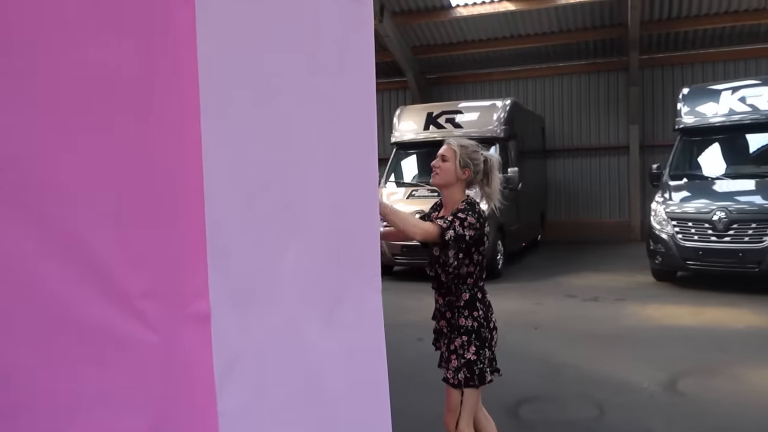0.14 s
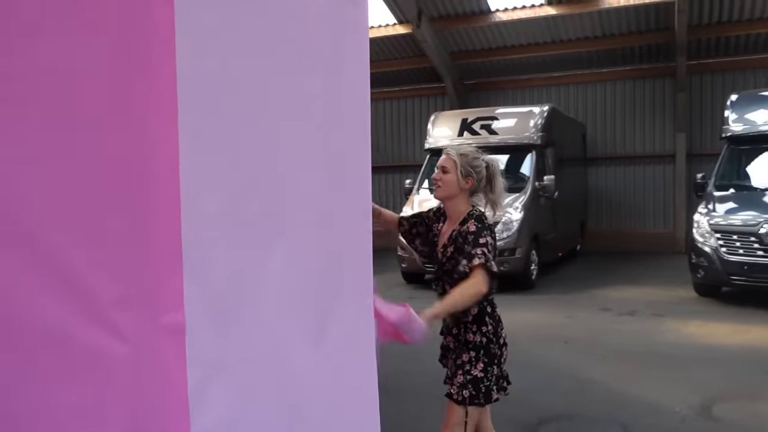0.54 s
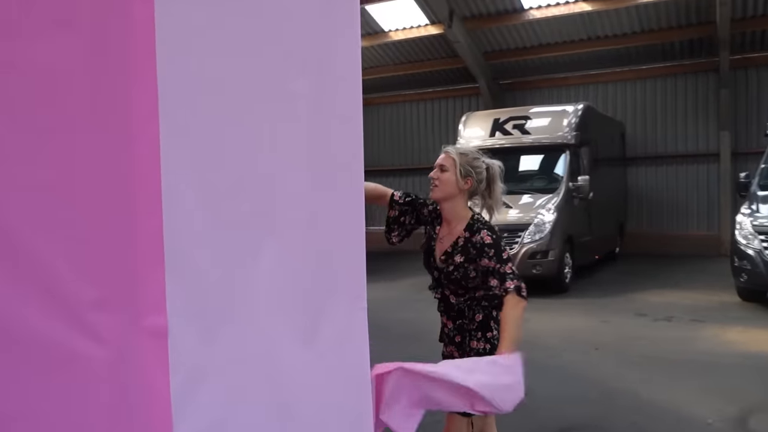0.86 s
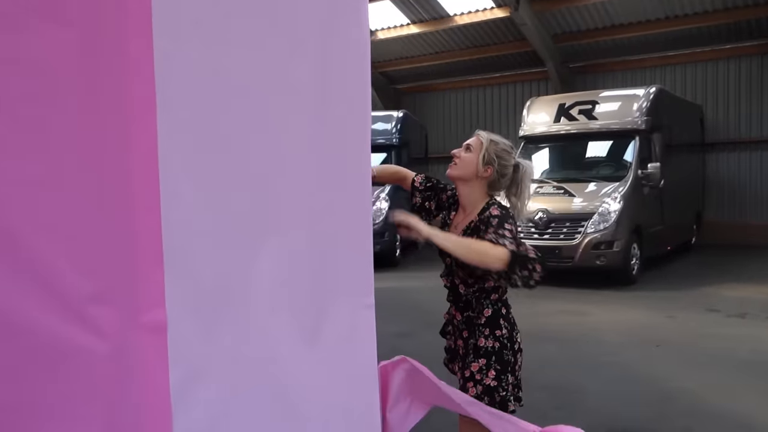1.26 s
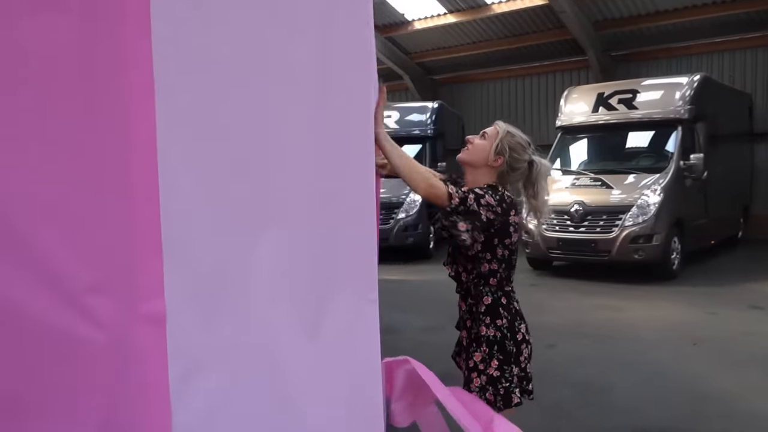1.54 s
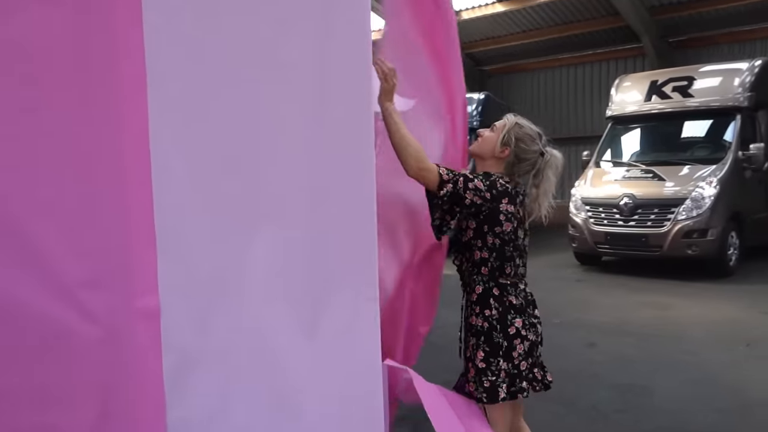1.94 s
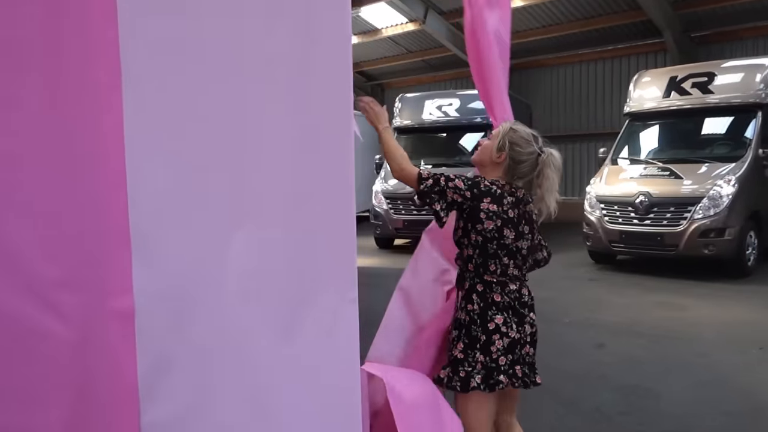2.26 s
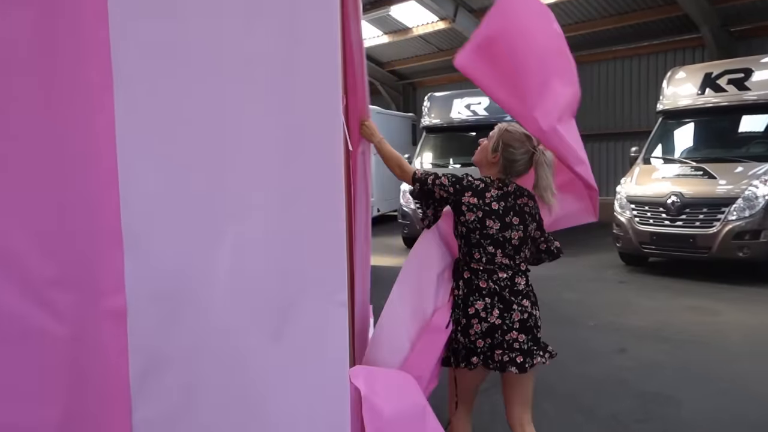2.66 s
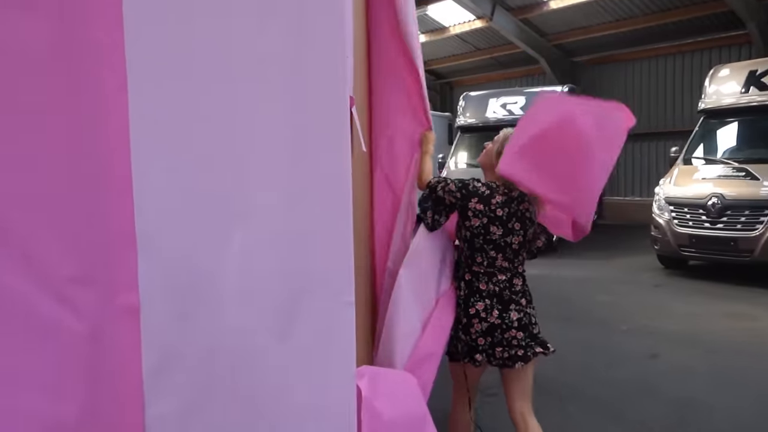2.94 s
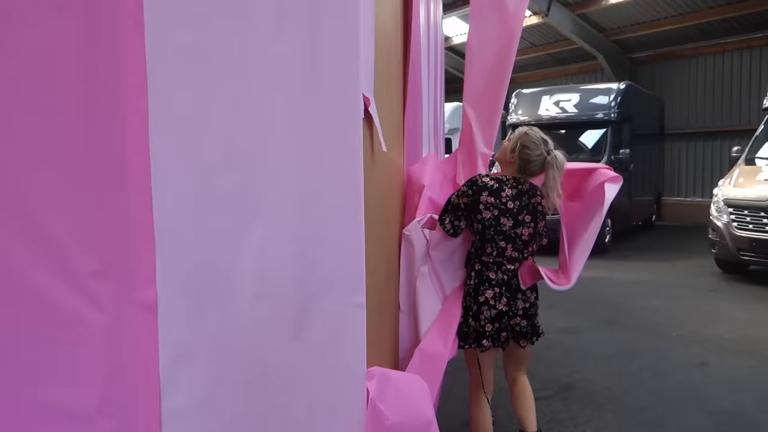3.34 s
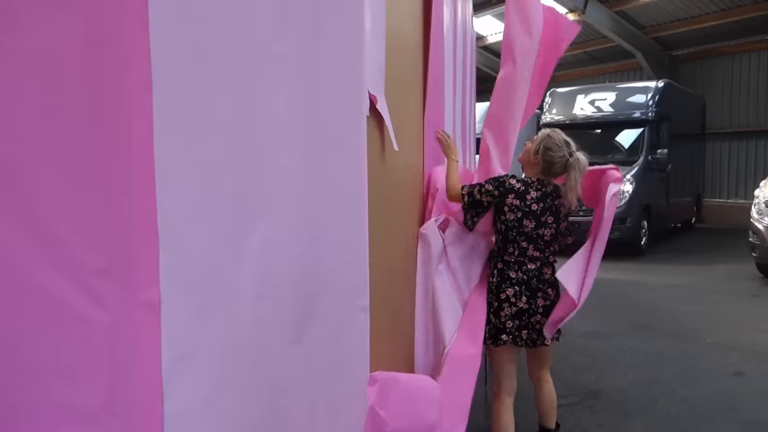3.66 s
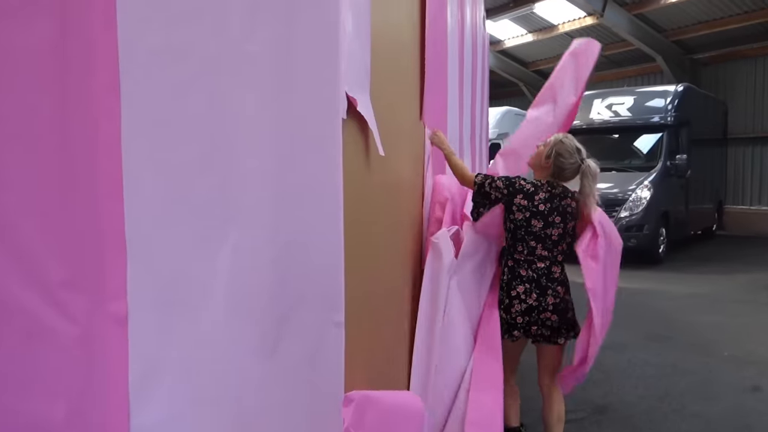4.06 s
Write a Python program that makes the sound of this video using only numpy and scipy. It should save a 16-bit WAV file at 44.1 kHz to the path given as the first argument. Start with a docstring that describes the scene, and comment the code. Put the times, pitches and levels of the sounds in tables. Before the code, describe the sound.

Large sheets of wrapping paper are torn away by hand in a big, reverberant shed. At the start a tear is already under way, running out by about 0.5 s with a brief snap near 0.3 s. Small creases pop between 0.6 and 0.9 s as a second pull builds, loudest around 0.9-1.2 s, then fades into echo. Another swells from 1.5 s, bursts at about 1.8-2.1 s and trails off with a short jerk. Quick rips and stalls from 2.6 s lead to close pulls near 2.7-3.2 s, bright and crackling. After a rattling lull around 3.4 s, the final hard tear runs from 3.6 s to the end, with strong snaps. Throughout, buckling folds rattle in the mid range and loose paper flaps faintly. The shed's middle tones linger for seconds while treble dies quickly; a very faint low hum lies beneath. Close stereo, treble leaning right.

```python
"""In a large shed, big sheets of wrapping paper are ripped down by hand, a little to the right.
Fibres part in a bright, clumped crackle, and the loose sheet rattles and flaps lower down: all are
shaped noise that follows the pulls of an arm. Single creases snap as short bursts of the same breaks.
The shed keeps the middle tones ringing between pulls as decaying noise, over a faint, wavering hum."""
import sys
import numpy as np
from scipy import signal
from scipy.fft import rfft, irfft, next_fast_len
from scipy.io import wavfile
from scipy.ndimage import uniform_filter1d, minimum_filter1d, map_coordinates

SR = 44100
rng = np.random.default_rng(int(sys.argv[2]) if len(sys.argv) > 2 else 0)


def gain_from_decibels(decibels):
    """Convert decibel values to linear amplitude factors."""
    exponent = np.asarray(decibels, float) / 20
    return 10 ** exponent


def unload_audio(sound):
    """Save the sound as a 16-bit wav file, at the path given as the first command line argument."""
    columns = np.transpose(np.atleast_2d(sound))
    # keep every value between -1 and 1, then stretch to whole-number steps
    steps = np.round(np.clip(columns, -1, 1) * 32767)
    wavfile.write(sys.argv[1], SR, steps.astype(np.int16))


N = 185264
LEAD = 2 * SR  # samples of tearing before time zero, whose echo is still in the shed
M = N + LEAD


def unit(x):
    """Normalisation: a signal scaled to rms 1."""
    return x / np.sqrt(np.mean(x ** 2) + 1e-20)


def along(points, hz):
    """Logarithmic frequency scale: (Hz, value) points interpolated along it."""
    f, v = np.transpose(points)
    return np.interp(np.log(hz + 1), np.log(f + 1), v)


def wobble(rate):
    """Band-limited fluctuation: a smooth random curve with rate knots a second."""
    knots = rng.standard_normal(int(M * rate / SR) + 4)
    return map_coordinates(knots, [np.arange(M) * rate / SR])


def filtered(x, response):
    """Linear filtering: the spectrum of x times a response of frequency."""
    m = next_fast_len(x.shape[-1] + 8192)
    spectrum = rfft(x, m) * response(np.fft.rfftfreq(m, 1 / SR))
    return irfft(spectrum, m)[..., :x.shape[-1]]


def coloured(x, spectrum):
    """Spectral shaping: x weighted by a (Hz, dB) curve and scaled to rms 1."""
    return unit(filtered(x, lambda hz: gain_from_decibels(along(spectrum, hz))))


def tilted(x, split_hz, tilt_db):
    """Spectral tilt: the part under the split raised and the part over it lowered by a changing amount."""
    low = filtered(x, lambda hz: 1 / (1 + (hz / split_hz) ** 4))
    return gain_from_decibels(tilt_db) * low + gain_from_decibels(-tilt_db) * (x - low)


def grains(spike_db, clump_db):
    """Crackling noise: countless tiny breaks, most weak and a few strong, clumped, along two unlike paths."""
    spikes_db = spike_db * rng.exponential(size=M)
    clumps_db = clump_db * wobble(60) + clump_db * 0.24 * wobble(250)
    return rng.standard_normal((2, M)) * gain_from_decibels(spikes_db + clumps_db)


def patchy(x, depth_db):
    """Brief resonance: each fold rings at its own pitch, as random gain in patches of time and frequency."""
    z = signal.stft(x, nperseg=256)[2]
    field = uniform_filter1d(rng.standard_normal(z.shape[1:]), size=4, axis=0)
    field = uniform_filter1d(field, size=8, axis=1)
    return signal.istft(z * gain_from_decibels(depth_db * unit(field)), nperseg=256)[1][:, :M]


# Spectrum of the air noise. Each row: frequency in Hz, relative density in dB per Hz.
AIR_SPECTRUM = [(12, -59), (20, -28), (140, -9), (250, -4.5), (320, -35), (550, -120)]
# Steady tone. Each row: frequency in Hz, mean amplitude in dB before the stereo stage.
HUM_TONES = [(107, -67.5)]


def background():
    """Stationary noise and a modulated tone: low, lumpy air under a slightly unsteady hum."""
    t = np.arange(M) / SR
    hum = 0
    for hz, db in HUM_TONES:
        level = gain_from_decibels(db + 2 * wobble(5))
        hum = hum + level * np.sin(2 * np.pi * hz * t + 1.2 * wobble(6))
    air = coloured(rng.standard_normal((2, M)), AIR_SPECTRUM)
    return hum + gain_from_decibels(-58.5 + 3.0 * wobble(7)) * air


# Reverberation of the shed. Each row: frequency in Hz, time to decay by 60 dB in seconds (at least .05).
SHED_DECAY = [(200, 3.1), (1500, 2.53), (4000, 0.92), (8000, 0.21), (15000, 0.048)]


def shed(x):
    """Diffuse reverberation: the power of each frequency dies at its own speed, carried by fresh noise."""
    hz, t, z = signal.stft(x[0], SR, nperseg=256)
    decay_s = np.clip(along(SHED_DECAY, hz), .05, 4)[:, None]
    linger = gain_from_decibels(-120 * t / decay_s)  # a power: 60 dB down after decay_s
    linger = linger * (t > .018) / linger.sum(axis=1, keepdims=True)  # the walls are some metres away
    power = np.abs(signal.fftconvolve(np.abs(z) ** 2, linger, axes=1)[:, :len(t)])
    noise = signal.stft(rng.standard_normal((2, M)), SR, nperseg=256)[2]
    carrier = unit(np.abs(noise)) * np.exp(1j * np.angle(noise))
    echo = signal.istft(carrier * np.sqrt(power), SR, nperseg=256)[1][:, :M]
    return x + gain_from_decibels(-2.0) * echo


# Spectrum of the buckling sheet and of dull snaps. Each row: frequency in Hz, relative density in dB per Hz.
RATTLE_SPECTRUM = [(180, -47), (300, -21.5), (499, -20), (548, -15), (680, -7), (734, -6.5), (781, -8),
                   (2230, -0.5), (12000, -20), (15600, -53), (22000, -120)]
# Spectrum of sharp breaks. Each row: frequency in Hz, relative density in dB per Hz.
TICK_SPECTRUM = [(1500, -38), (3500, -6.5), (6000, 0), (10000, -6), (15700, -6.5)]
# Creases snapping. Each row: start in seconds, relative strength in dB, dull part over the bright
# part in relative dB, thickness as a bass tilt in dB (held at -2.5 or more).
CREASE_SNAPS = [(0.319, -6, -15, 6), (0.5404, -29, 1, 0.3), (0.6434, -13.5, -5, 7.5), (0.6844, -16, -8, 5),
                (0.697, -14, -6, 0.3), (0.7254, -9, -4, 7), (0.7674, -20, -6, 0.3), (0.786, -18, 13, 0.3),
                (0.799, -12.5, 13, 0.3), (0.8134, -23, -7, 0.3), (0.8574, -13, 12, 0.3),
                (0.95, -9, -3, 0.3), (1.542, -11.5, -11, 0.3), (1.6104, -16, 2, 0.3),
                (1.6951, -16, 11, 0.3), (1.711, -14, 6, 0.3), (1.736, -17, 9, -1), (1.7579, -16, -1, 0.3),
                (1.829, -5.5, -9, 7), (2.4468, -16.5, 4, 6.5), (2.4614, -23, -1, 0.3), (2.5606, -22, -1, 1),
                (2.6312, -10, 7, 2), (2.727, -13, 2, -8), (2.7876, -13, -8, -1), (3.5049, -14.5, 13, 10),
                (3.5488, -18, 0, 0.3), (3.572, -23, -4, 0.3), (3.604, -15, -10, 11), (3.6299, 0, -8, 4),
                (3.683, 0, -3, 0.3), (3.815, -9, -8, -15), (3.8557, -1, -19, -8), (3.9398, -2.5, -20, -2.3),
                (4.0294, -6, -5, 4), (4.0648, -22, 3, 0.3), (4.1004, -11, -10, -3), (4.1533, -2, -7, -5)]


def snaps():
    """Impulsive fracture: each snap is a burst of breaks that starts at once and soon runs out."""
    bright, dull = np.zeros(M + SR), np.zeros(M + SR)
    t = np.arange(SR // 5) / SR
    burst = np.exp(-(t / .003) ** 2) + 0.53 * np.exp(-t / 0.0016)  # the first break is the sharpest
    for s, db, dull_db, _ in CREASE_SNAPS:
        span = slice(LEAD + round(s * SR), LEAD + round(s * SR) + len(t))
        bright[span] += gain_from_decibels(db - 13) * burst
        dull[span] += gain_from_decibels(db + dull_db - 21.0) * burst
    s, thick_db = np.transpose(CREASE_SNAPS)[[0, -1]]
    latest = np.searchsorted(s, (np.arange(M) - LEAD) / SR) - 1
    thick_db = np.maximum(thick_db[np.clip(latest, 0, None)], -2.5)
    breaks = coloured(patchy(grains(1.5, .5), 2.2), TICK_SPECTRUM)
    folds = coloured(grains(2.1, 0.36), RATTLE_SPECTRUM)
    return bright[:M] * tilted(breaks, 9000, thick_db) + dull[:M] * folds


# Pulls of the arm. Each row: time at full speed in seconds, speeding up in dB per second, time held in
# seconds, running out in dB per second, relative crackle level in dB. The swing scales both slopes.
ARM_PULLS = [(-.1, 40, 0.5, 95, -20), (.97, 35.5, 0.24, 68, -21.5), (1.88, 50, 0.24, 49.5, -21.5),
             (2.7, 72, 0.27, 58, -25), (3.07, 83, 0.086, 44, -20), (3.65, 127, .49, 57, -21.5)]


def strokes(t, swing):
    """Piecewise exponential envelope: the dB level of every pull speeds up, tires and runs out."""
    s, rise_db, held, fall_db, top_db = np.transpose(ARM_PULLS)[:, :, None]
    after = t - s
    rise = rise_db * np.minimum(after, 0)
    sag = 6.5 * np.clip(after, 0, held)  # dB: the tear tires while held
    fall = fall_db * np.maximum(after - held, 0)
    return top_db + swing * (rise - sag - fall)


# Short rips in one jerk. Each row: start in seconds, length in seconds, relative crackle level in dB,
# relative rattle level in dB.
SHORT_RIPS = [(0.177, 0.061, -29, -10), (0.594, 0.0079, -59, -44), (0.716, 0.014, -25, -24),
              (0.812, 0.022, -31, -7.5), (0.91, 0.018, -19.5, -19), (1.023, 0.028, -35, -17),
              (1.649, 0.046, -31, -20), (1.456, 0.016, -41, -38), (1.777, 0.022, -20, -15.5),
              (2.08, 0.033, -22, -19), (2.15, .015, -21, -22), (2.64, 0.04, -19, -19.5),
              (2.725, .025, -31, -25), (2.804, 0.047, -22.5, -42), (2.857, .06, -27.5, -20),
              (2.96, 0.013, -26, -37), (3.36, 0.077, -33, -18.5), (3.051, 0.056, -21, -21),
              (3.6, 0.019, -27, -33), (3.874, .06, -48, -17), (4.006, 0.019, -22, -18),
              (4.185, .02, -27, -26)]
# The tear catches for a moment. Each row: start in seconds, length in seconds, drop of the pulls in dB
# before the swing scales it (negative: a lift).
CATCHES = [(0.05, .025, 4), (0.133, 0.034, 1), (0.613, 0.022, 10), (.655, 0.028, 14), (.703, 0.02, 13),
           (.748, 0.009, 2), (0.891, .025, 3), (1.058, .02, -5.5), (1.552, 0.024, 12), (1.811, 0.03, 5),
           (2.112, 0.018, 4), (2.516, 0.029, 6), (2.684, .02, 7), (2.755, 0.028, 1.5), (3.513, 0.016, 1),
           (3.575, .012, 7), (3.752, 0.01, 0), (3.936, .02, 4), (4.033, 0.024, 4), (4.159, .022, 10)]


def effort(t, swing, lag, over_db, count):
    """Energy addition: dB level of pulls, stalls and rips together; count picks the column of rip levels."""
    s, length = np.transpose(SHORT_RIPS)[:2, :, None]
    onset = np.clip((t - s) / 0.0061 + .5, 0, 1)
    jerks = onset * np.exp(-np.maximum(t - s - length, 0) / 0.0058)
    jerks = jerks * gain_from_decibels(np.transpose(SHORT_RIPS)[count][:, None])
    s, length, drop_db = np.transpose(CATCHES)[:, :, None]
    caught = np.clip(np.minimum(t - s, s + length - t) / 0.0046 + .5, 0, 1)
    caught_db = (drop_db * caught).sum(axis=0)
    pulls = gain_from_decibels(strokes(t - lag, swing) + over_db - swing * caught_db)
    return 10 * np.log10((pulls ** 2).sum(axis=0) + (jerks ** 2).sum(axis=0))


# Spectrum of the loose sheet. Each row: frequency in Hz, relative density in dB per Hz.
FLAP_SPECTRUM = [(60, -69), (150, -13.5), (280, 5), (500, 0), (900, -2), (2000, -37)]


def flap(level_db):
    """Low-frequency radiation: the loose sheet flaps as slowly swelling noise."""
    noise = coloured(rng.standard_normal((2, M)), FLAP_SPECTRUM)
    return gain_from_decibels(level_db - 6.0 + 1.27 * wobble(12)) * noise


def rattle(level_db, slack_db, jerk):
    """Buckling instability: folds give way in clumps, and slack paper buckles in deeper folds."""
    folds = coloured(patchy(grains(2.6, 1.18), 1.42), RATTLE_SPECTRUM)
    folds = tilted(folds, 1720, slack_db + 0.53 * wobble(12))
    return gain_from_decibels(level_db - 2.0 + 0.98 * jerk) * folds


# Spectrum of parting fibres. Each row: frequency in Hz, relative density in dB per Hz.
CRACKLE_SPECTRUM = [(880, -34), (1500, -32), (2810, 3), (3360, -2), (4330, -1.5), (5380, -7.5),
                    (9240, -10.5), (15700, -15.5)]


def crackle(level_db, fine_db, jerk):
    """Fracture noise: fibres part in a clumped crackle with sharper ticks on top."""
    fibres = coloured(patchy(grains(2.3, 1.63), 2.4), CRACKLE_SPECTRUM)
    # now and then a tougher spot lets go within a millisecond or two
    knots = gain_from_decibels(7.5 * np.maximum(wobble(420) - 1.4, 0))
    ticks = gain_from_decibels(-1.5) * coloured(patchy(knots * grains(4.1, 2.3), 1.8), TICK_SPECTRUM)
    return gain_from_decibels(level_db + 1.37 * jerk) * (tilted(fibres, 4800, -fine_db) + ticks)


# State of the paper, before the effort shifts both tilts. Each row: time in seconds, buckling as rattle
# over the crackle level of a full pull in relative dB, flapping over rattle in relative dB, slackness
# as a bass tilt in dB, fineness of the tear as a treble tilt in dB.
PAPER_STATE = [(0, 8, -19, 2, 1), (.2, 8.5, -12, 1.5, 5.5), (.45, 3, -22, -0.5, 1),
               (.68, 6.5, -24, -1, -2.5), (.9, 7.5, -14.5, 2, -4), (1.2, 7.5, -31, -0.5, 4),
               (1.5, 8, -15, -0.5, 1), (1.68, 9, -21, 1.5, -4), (1.87, 8, -21, -2, 2.5),
               (2.0, 7.5, -29, 0, 0), (2.25, 9.5, -21.5, 1.5, 1), (2.6, 3.5, -15, -4, 0.5),
               (2.8, 2, -24, -0.5, 5), (3.0, 2, -23, -0.5, 0.5), (3.2, 4.5, -19.5, 3.5, -3),
               (3.4, 4, -8.5, 3, 2), (3.65, 5, -10.5, -1.5, 1), (3.8, 7.5, -23, 1.5, 2),
               (4.0, 6.5, -22, 1.5, 2), (4.2, 6, -12, 3.5, 0)]


def sheet():
    """Common excitation: one arm drives the crackle of the tear and the rattle and flap of freed paper."""
    t = np.maximum(np.arange(M) - LEAD, 0) / SR  # the lead holds the state of time zero
    s, *columns = np.transpose(PAPER_STATE)
    buckle_db, loose_db, slack_db, fine_db = [np.interp(t, s, column) for column in columns]
    crackle_db = effort(t, 1, 0, 0, count=-2)
    # the sheet buckles 13 ms after the tear moves and swings less widely
    rattle_db = effort(t, 0.7, 0.013, buckle_db, count=-1)
    fine_db = fine_db + 0.55 * (crackle_db + 23)  # a fast tear is finer
    slack_db = slack_db - 0.35 * (rattle_db + 11.5)  # a sheet at rest is slacker
    jerk = wobble(14)  # the hand pulls unevenly
    freed = rattle(rattle_db, slack_db, jerk) + flap(rattle_db + loose_db)
    return freed + crackle(crackle_db, fine_db, jerk)


# Stereo coherence. Each row: frequency in Hz, left-right likeness from 0 to 1.
LIKENESS = [(40, .92), (90, .985), (180, .996), (350, .991), (700, .978), (1400, .88), (2800, .76),
            (5600, .43), (15000, .45)]
# Stereo balance. Each row: frequency in Hz, left minus right in dB.
BALANCE = [(380, 0), (700, -.5), (1300, -2), (2400, -4.2), (4600, -7.8), (8100, -5.5), (15000, -5.6)]


def scene():
    """Interaural-style coherence: two paths meet at close ports, alike in the bass, apart in the treble,
    where the right is louder."""
    paper = shed(sheet() + snaps())
    paper = filtered(paper, lambda hz: 1 / (1 + (190 / (hz + 1)) ** 6))  # thin paper radiates no bass

    def mid_and_side(hz):
        turn = np.arccos(np.clip(along(LIKENESS, hz), 0, 1)) / 2
        return np.array([np.cos(turn), np.sin(turn)])

    mid, side = filtered(paper + background(), mid_and_side)
    pair = np.array([mid + side, mid - side])
    return filtered(pair, lambda hz: gain_from_decibels(np.outer([.5, -.5], along(BALANCE, hz))))[:, LEAD:]


def roll_off(x):
    """The treble ends steeply here."""
    return signal.sosfilt(signal.butter(12, 16860, fs=SR, output="sos"), x)


def record(dry):
    """Band limiting and peak limiting: nothing above 15.8 kHz; both sides duck around peaks beyond 0.95."""
    x = filtered(dry, lambda hz: hz < 15800)
    need = np.minimum(1, .95 / (np.abs(x).max(axis=0) + 1e-9))
    gain = uniform_filter1d(minimum_filter1d(need, size=177), size=88)  # 4 ms hold, 2 ms smoothing
    return roll_off(x * gain)


dry = scene()
out = record(dry)
unload_audio(out)
```